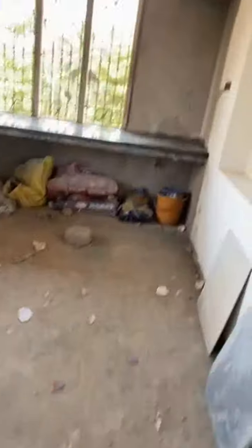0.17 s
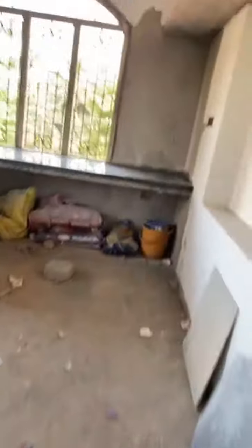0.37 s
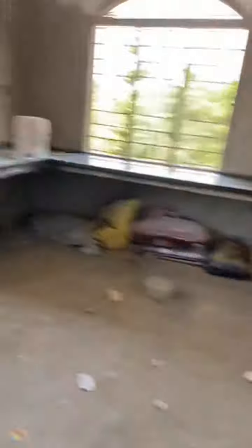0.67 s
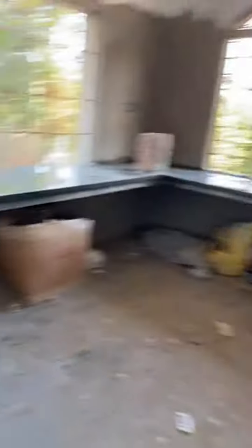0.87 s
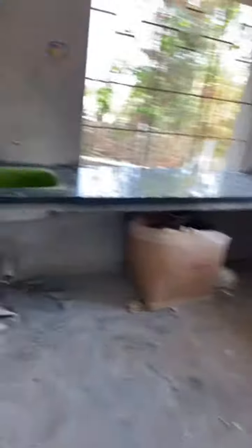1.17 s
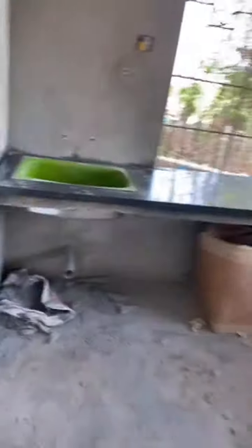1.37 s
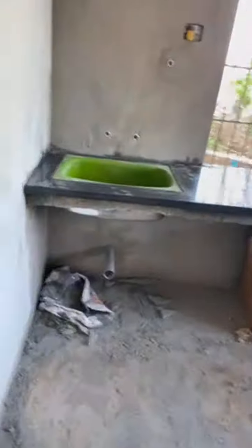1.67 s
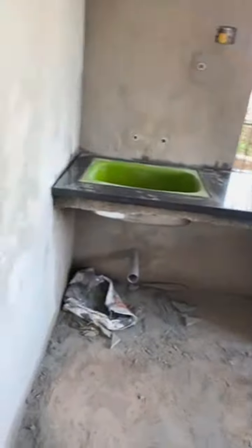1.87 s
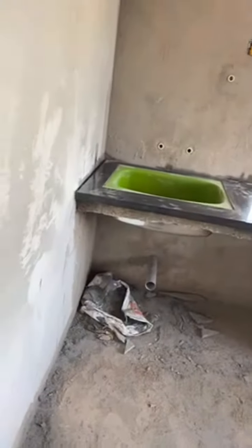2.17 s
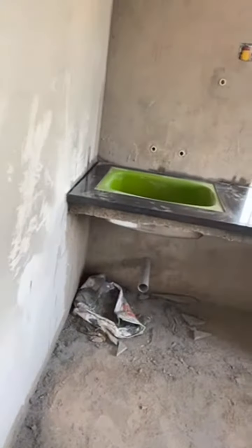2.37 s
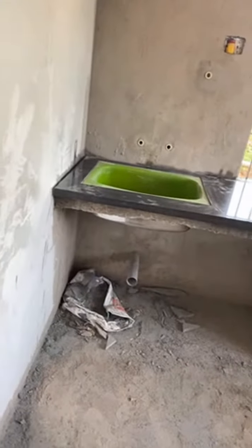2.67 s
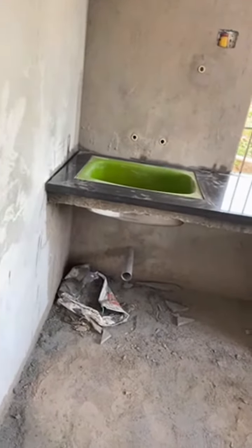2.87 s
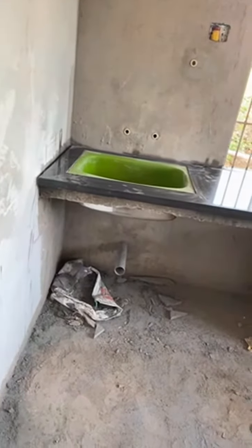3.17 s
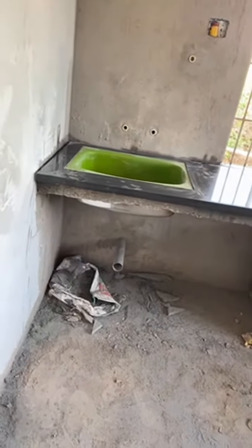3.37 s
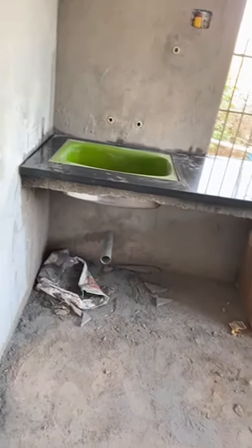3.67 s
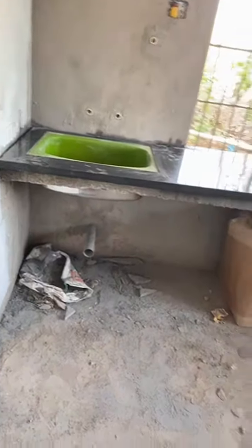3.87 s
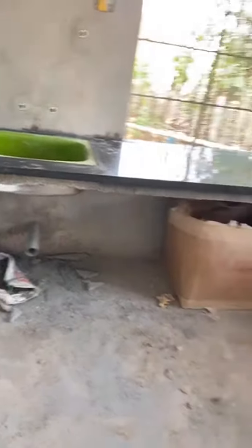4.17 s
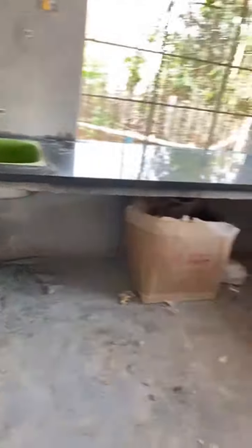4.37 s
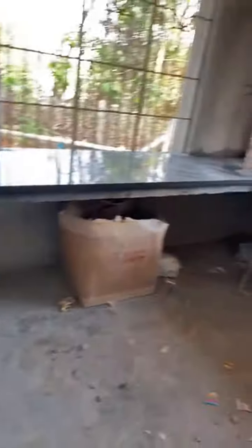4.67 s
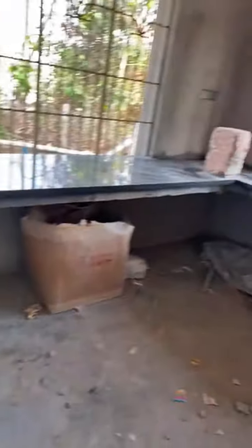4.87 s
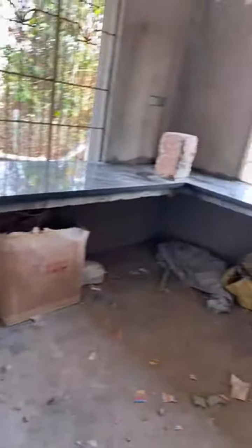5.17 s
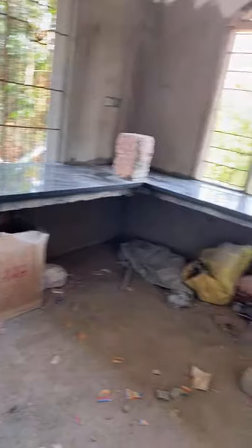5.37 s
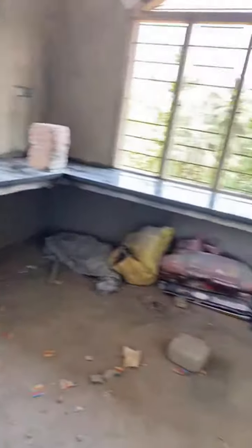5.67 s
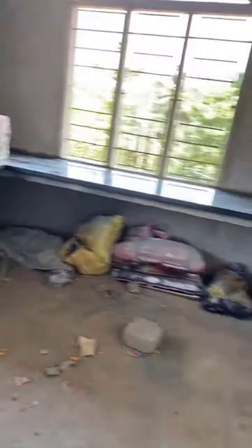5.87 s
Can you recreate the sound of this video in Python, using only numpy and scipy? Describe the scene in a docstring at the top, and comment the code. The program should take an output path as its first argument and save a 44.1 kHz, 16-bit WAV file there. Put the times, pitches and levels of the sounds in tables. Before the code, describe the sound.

A heavy engine drones outside a bare concrete room, booming as it slowly gains speed over a traffic rumble. Indoors a shoe scuffs the gritty floor twice, and the sound briefly cuts out with small clicks. Just past halfway the engine drops at a gear change, then pulls again, lower and quieter. Two dull thuds come near the end. Faint birds and insects carry on in the distance.

```python
"""One microphone in a bare concrete room; outside, a heavy engine over traffic, far birds and insects.
The engine pulls up in speed, its exhaust booming through resonances. Indoors a shoe scuffs the gritty
floor at 0.5 and 1.7 s. Between 1.4 and 2.6 s the sound cuts out four times for milliseconds, with clicks.
The engine rasps near top speed, drops at a gear change at 3.5 s and pulls again, lower, from 4.2 s.
A bright tick and a dull thud sound during the change, and two more thuds near the end."""
import sys
import numpy as np
from scipy import signal
from scipy.fft import rfft, irfft, next_fast_len
from scipy.io import wavfile
from scipy.ndimage import uniform_filter1d

SR = 44100
rng = np.random.default_rng(int(sys.argv[2]) if len(sys.argv) > 2 else 0)


def pcm_store(signal):
    """Save signal as 16-bit PCM."""
    levels = np.round(np.clip(np.atleast_2d(signal), -1, 1) * 32767)
    wavfile.write(sys.argv[1], SR, levels.astype(np.int16).T)


N = 264732
TIME = np.arange(N) / SR
LIFT_S, CLOSE_S, ENGAGE_S, OPEN_S = 3.49, 0.23, 4.2, 0.11  # throttle: start and length of each move

# the engine outside: time_s, cycles_per_s
ENGINE_SPEED = [(0.0, 44.4), (0.3, 44.4), (1.1, 47.4), (2.3, 49.9), (2.7, 51.1), (3.1, 51.5), (3.54, 52.5),
                (4.3, 38.5), (5.0, 38.8), (6.0, 40.5)]
# engine loudness: cruise_db, slope_db per cycle/s, throttle_closed_db, next_gear_db
BOOM_LOUDNESS = (-48, 0.73, -14.5, -2.5)
ROAR_LOUDNESS = (-46, 0.66, -16.5, -4.5)
# resonances of the exhaust boom and of the room: centre_hz, width_hz, gain_db
BOOM_RESONANCES = [(80.5, 6.6, 12.5), (91.3, 4, -3.5), (93, 2.8, -1.5), (98.6, 1.84, 4), (103.7, 2.8, 12.5),
                   (116.75, 1.06, 12.5), (140, 8.3, 8.5), (160.8, 4.3, -8.5), (188.3, 5.7, 5.5)]
ROOM_RESONANCES = [(146.7, 7.8, -12), (173, 3.2, 1), (191, 13.5, 3.5), (219, 24, -3), (285, 28, 3.5),
                   (358, 32, 2)]
# the boom swells or sinks for a moment: centre_s, width_s, gain_db
BOOM_SURGES = [(.03, 0.1, -2), (0.226, 0.027, 10.5), (.8, 0.056, 7), (1.2, .17, 0.5), (2.97, 0.072, -3.5),
               (1.43, 0.1, -5.5), (2.4, 0.077, -9.5), (3.6, 0.017, -7), (3.69, 0.027, 12.5),
               (4.4, .04, 1.5), (4.83, 0.03, -11), (5.8, 0.21, 4)]
# weaker engine lines, and the whine above them: speed_multiple, peak_s, width_s, level_db
WEAK_ORDERS = [(2.75, 1.57, 0.12, -40), (2.75, 2.38, 0.21, -41.5), (3.25, 3.14, 0.5, -45.5),
               (3.5, 2.7, 0.18, -42.5), (3.75, 1.1, 0.16, -46), (3.75, 2.4, .3, -49), (4, 3.04, 0.24, -46),
               (4.25, 1.33, 0.39, -47), (4.2, 2.2, 0.2, -46), (4.25, 2.51, 0.044, -40.5),
               (4.28, 3.35, 0.11, -43), (5, 3.83, 0.92, -51.5), (5.25, 3.1, 0.25, -50.5),
               (6.75, 2.8, 0.29, -54.5), (7.97, 2.45, 0.71, -55), (9.8, 2.34, 0.47, -57.5),
               (10.25, 2.98, 0.18, -55), (11, 1.16, 0.49, -57.5), (10.4, 2.65, .1, -56),
               (11, 2.924, 0.14, -47.5), (11.95, 0.42, 0.11, -54.5), (12, 2.05, 0.19, -57),
               (11.95, 3.26, 0.31, -56), (14.1, 3.22, 0.33, -57), (2.24, 4.4, 0.91, -55),
               (7, 4.58, 0.21, -52.5), (5.05, 5.67, 0.087, -48)]
WHINE_ORDERS = [(29.7, 0.68, 0.4, -62.5), (29.9, 1.32, 0.19, -61), (30.7, 1.96, 0.19, -60.5),
                (26.85, 2.28, 0.29, -62), (26.96, 2.99, 0.22, -51), (24.45, 2.98, 0.16, -56),
                (24.9, 3.22, .12, -55.5), (30, 3.03, 0.13, -54.5), (28.3, 3.43, 0.17, -55)]
# traffic behind the engine: time_s, rumble_db, murmur_db
TRAFFIC_LEVELS = [(0, -47.5, -53), (1.0, -46.5, -52), (1.6, -43, -49.5), (2.3, -44, -51.5),
                  (3.5, -42.5, -50), (3.8, -46, -53.5), (4.1, -47, -53.5), (4.7, -45, -52),
                  (5.3, -46.5, -54), (6, -46, -54)]

# noise spectra of engine, traffic, shoe, tick and thuds: frequency_hz, relative_db
ROAR_SPECTRUM = [(30, -38), (55, -14), (75, -20), (130, 6.5), (210, -1.5), (320, -9), (450, -8), (560, -5),
                 (850, -15), (1100, -14), (1420, -8.5), (2000, -14.5), (3700, -39), (6000, -44),
                 (15000, -73)]
RASP_SPECTRUM = [(600, -34), (1000, -2), (1150, -5.5), (1260, -3), (1400, -1), (1600, -16), (2400, -59)]
RUMBLE_SPECTRUM = [(25, -32), (42, -20), (60, -11.5), (90, -1), (140, -3.5), (190, 1), (340, -12),
                   (600, -22.5), (1200, -57), (4000, -91)]
MURMUR_SPECTRUM = [(150, -36), (350, -12.5), (600, -15), (1150, -20), (1350, -19.5), (1540, -17),
                   (1800, -24.5), (2400, -33.5), (3000, -37.5), (3700, -42), (4500, -40.5), (7500, -44.5),
                   (11000, -52), (16000, -64)]
SCUFF_SPECTRUM = [(300, -16), (800, 4), (1200, 12.5), (1900, 6.5), (2600, -6.5), (4000, -14.5), (9000, -28),
                  (15000, -54)]
TICK_SPECTRUM = [(500, -1), (3500, 5.5), (9000, -5), (15000, -14)]
THUD_SPECTRUM = [(60, -26), (150, -19), (195, -2), (280, -6), (380, -12), (700, -14), (3000, -51),
                 (10000, -90)]

# short noises in the room with the microphone: start_s, level_db, rise_s, decay_s
SHOE_SCUFFS = [(0.503, -49, .025, 0.035), (1.712, -44.3, 0.03, 0.11), (1.795, -54, .025, .07)]
ROOM_THUDS = [(3.675, -50, .02, .06), (5.24, -42.5, .012, .035), (5.335, -46, .012, .03)]
# tones indoors and from the nearer birds: start_s, length_s, pitch_hz, width_hz, level_db
SOLE_SQUEAKS = [(1.721, .028, 2650, 160, -54.5)]
ROOM_HUMS = [(.45, .13, 268, 20, -47), (1.55, .12, 375, 22, -43.5), (1.66, .2, 371, 30, -47),
             (1.58, .34, 268, 16, -53), (3.97, .2, 113, 9, -53), (3.95, .65, 364, 30, -57),
             (4.66, .22, 373, 24, -50.5), (5.62, .45, 180, 9, -51)]
NEAR_BIRD_NOTES = [(.56, .1, 4350, 260, -76), (.8, .11, 4500, 300, -74), (.87, .05, 4320, 160, -73),
                   (.94, .04, 4540, 200, -71), (1.08, .05, 4520, 200, -71), (1.26, .11, 4510, 300, -73),
                   (1.85, .04, 4470, 300, -70), (1.92, .04, 4620, 360, -70), (2.66, .07, 4520, 340, -73),
                   (3.62, .13, 4450, 300, -77), (4.475, .03, 4220, 200, -74), (4.628, .03, 4420, 240, -69),
                   (4.772, .025, 4440, 300, -69), (4.817, .032, 4440, 200, -66),
                   (4.86, .022, 4440, 200, -70), (4.918, .05, 4450, 260, -69), (5.038, .04, 5130, 260, -73),
                   (5.143, .055, 4420, 260, -74), (5.213, .06, 4410, 180, -67.5),
                   (5.368, .018, 4420, 200, -65), (5.438, .035, 4400, 180, -72)]
# far birds: pitch_hz, scatter_hz, chirps_per_s, level_db
FAR_FLOCKS = [(2950, 220, 200, -81), (4560, 260, 200, -80), (5350, 420, 180, -83), (7300, 800, 260, -84.5)]
# their chorus swells and sinks: time_s, gain_db
CHORUS_GAIN = [(0, 7), (.5, 5), (1.4, 4), (2.3, 2), (3.1, 6.5), (3.7, 0.5), (4.2, -1), (4.7, 3.5),
               (5.4, 1.5), (5.7, -2), (6, -1)]
# insects in the trees: start_s, length_s, pitch_hz, width_hz, level_db, buzz_depth
INSECT_TRILLS = [(.7, 0.96, 9170, 80, -83, 2), (1.6, 0.9, 9150, 80, -81.5, 2),
                 (2.72, 0.44, 9920, 340, -73, .3), (4.4, 1.05, 8870, 80, -80.5, 2.2)]

# brief silences: start_s, length_s
DROPOUTS = [(1.4605, .016), (1.6394, .003), (2.2195, .003), (2.5195, .007)]
# clicks where the sound breaks off or jumps: start_s, step_db, bump_db
SIGNAL_CLICKS = [(1.4643, -56, -76), (1.4765, -35, -72), (1.4966, -42, -35), (1.64, -32.5, -60),
                 (1.6427, -38, -53), (1.6624, -29.5, -53), (2.242, -26, -34), (2.526, -42, -34.5),
                 (2.5473, -40, -57), (3.539, -39, -35.5)]
# a tick where the sound jumps: start_s, level_db, rise_s, decay_s
SIGNAL_TICKS = [(3.539, -60, .001, .018)]


def engine(throb=0.064, flutter_db=1.42):
    """Just outside, on one shaft speed: exhaust boom, roar and rasp that throb with the firing, whine."""
    speed = curves(ENGINE_SPEED)[0]
    turns = np.cumsum(speed) / SR
    boom = exhaust_boom(speed, turns)
    firing = (1 + throb * np.cos(2 * np.pi * 2 * turns)) * amp(flutter_db * drift(33))
    roar = amp(engine_db(speed, ROAR_LOUDNESS)) * noise(ROAR_SPECTRUM)
    rasp = amp(-50.5) * bell(TIME, centre=3.04, width=0.23) * noise(RASP_SPECTRUM)
    singing = engine_orders(turns, WEAK_ORDERS, spread=0.36)
    whine = engine_orders(turns, WHINE_ORDERS, spread=0.21)
    return boom + firing * (roar + rasp) + singing + whine


def exhaust_boom(speed, turns, spread=0.14):
    """Low exhaust orders boom or sink as they sweep through resonances."""
    boom_db = engine_db(speed, BOOM_LOUDNESS) + humps(TIME, BOOM_SURGES)
    order_db = {order: boom_db + humps(order * speed, BOOM_RESONANCES) for order in (2, 3, 4)}
    boom = sum(amp(db) * fading_sine(order * turns, spread, 3.7) for order, db in order_db.items())
    # unequal cylinders sound an octave below the firing
    return boom + amp(order_db[2] - 17) * fading_sine(turns, spread, 5)


def engine_orders(turns, orders, spread):
    """Lines at multiples of the engine's speed swell and fade while it pulls."""
    lifted, engaged = gear_change()
    lines = sum(amp(db) * bell(TIME, peak_s, width_s) * fading_sine(order * turns, spread, 9.9)
                for order, peak_s, width_s, db in orders)
    return (1 - lifted + engaged) * lines


def engine_db(speed, law, cruise_hz=50):
    """The engine is louder the faster it turns, and quieter off the throttle and in the next gear."""
    cruise_db, slope_db, closed_db, geared_db = law
    lifted, engaged = gear_change()
    pulling_db = cruise_db + slope_db * (speed - cruise_hz)
    return pulling_db + closed_db * (lifted - engaged) + geared_db * engaged


def gear_change():
    """Two ramps, 0 to 1: the throttle lifts, then the next gear engages."""
    return np.clip((TIME - LIFT_S) / CLOSE_S, 0, 1), np.clip((TIME - ENGAGE_S) / OPEN_S, 0, 1)


def traffic(rumble_swell_db=1.5, murmur_swell_db=1.1):
    """Traffic farther off: a rumble that booms in the bare room, and a murmur above it."""
    rumble_db, murmur_db = curves(TRAFFIC_LEVELS)
    rumble = amp(rumble_db + rumble_swell_db * drift(29)) * noise(RUMBLE_SPECTRUM, ROOM_RESONANCES)
    murmur = amp(murmur_db + murmur_swell_db * drift(24)) * noise(MURMUR_SPECTRUM)
    return rumble + murmur


def shoe():
    """Indoors, a sole scrapes and squeaks on sandy concrete."""
    scrapes = sum(burst(row, SCUFF_SPECTRUM, grain_db=2.0) for row in SHOE_SCUFFS)
    return scrapes + tones(SOLE_SQUEAKS, spread=0.6)


def thuds():
    """Dull knocks boom briefly between the bare walls."""
    return sum(burst(row, THUD_SPECTRUM, grain_db=4.0) for row in ROOM_THUDS)


def hums():
    """Low hums swell and fade in the room."""
    return tones(ROOM_HUMS, spread=0.23)


def tick():
    """A short, bright tick where the sound jumps at 3.5 s."""
    return sum(burst(row, TICK_SPECTRUM, grain_db=6.5) for row in SIGNAL_TICKS)


def birds():
    """Out in the trees, a far chorus and a few nearer, rough chirps, smeared by the room."""
    chorus = amp(curves(CHORUS_GAIN)[0]) * sum(far_flock(*row) for row in FAR_FLOCKS)
    far = room(chorus, t60_s=.3, wet=.4)
    notes = tones(NEAR_BIRD_NOTES, spread=0.55, swell=.35)
    return far + room(notes, t60_s=.25, wet=.15)


def far_flock(centre_hz, scatter_hz, per_s, db, chirp_s=.01, glide_hz=400, range_db=18, tries=1600):
    """Many birds at different distances: tiny gliding chirps that swell and die, most of them faint."""
    out, t = np.zeros(N + SR), np.arange(SR // 24) / SR
    for when, chance, pitch, distance, glide, span in rng.random((tries, 6)):
        if chance * tries < per_s * N / SR:
            hz = centre_hz + scatter_hz * np.log(pitch / (1 - pitch)) / 2  # crowds round the centre
            age = t / (chirp_s * (.5 + span))
            turns = hz * t + (glide - .5) * glide_hz * chirp_s * (1 - np.exp(-age))
            envelope = amp(-range_db * distance) * age * np.exp(-2 * age)
            out[int(when * N):][:len(t)] += envelope * np.sin(2 * np.pi * turns)
    return amp(db) * unit(out[:N])


def insects(wingbeat_hz=195):
    """Faint, high trills from the trees, chopped into pulses by the wings."""
    wingbeat = np.cos(2 * np.pi * wingbeat_hz * TIME)
    return sum(unit(np.exp(depth * wingbeat)) * tones([trill], spread=4.7, swell=0.78)
               for *trill, depth in INSECT_TRILLS)


def room(x, t60_s, wet):
    """Bare concrete round the microphone smears a sound with dense reflections."""
    t = np.arange(SR // 2) / SR
    tail = rng.standard_normal(len(t)) * amp(-60 * t / t60_s)
    reflections = signal.fftconvolve(x, tail / np.linalg.norm(tail))[:N]
    return np.sqrt(1 - wet) * x + np.sqrt(wet) * reflections


def burst(row, spectrum, grain_db):
    """Grainy noise that rises fast and dies away."""
    start_s, db, rise_s, decay_s = row
    age = np.maximum(TIME - start_s, 0)
    envelope = np.minimum(age / rise_s, 1) * np.exp(-np.maximum(age - rise_s, 0) / decay_s)
    return amp(db + grain_db * drift(130)) * envelope * noise(spectrum)


def tones(rows, spread, swell=0.17):
    """Tones blurred by reflections, each fading in and out."""
    out = np.zeros(N + 2 * SR)
    for start_s, length_s, hz, width_hz, db in rows:
        t = np.arange(0, length_s, 1 / SR)
        arch = abs(np.sin(np.pi * t / length_s)) ** swell
        out[int(start_s * SR):][:len(t)] += amp(db) * arch * fading_sine(hz * t, spread, width_hz / 2)
    return out[:N]


def fading_sine(turns, spread, rate_hz):
    """A sine plus a randomly fading copy, as its reflections add to it."""
    phase = 2 * np.pi * ((turns + rng.random()) % 1)
    along, across = (spread * drift(rate_hz, size=len(turns)) for _ in range(2))
    return ((1 + along) * np.cos(phase) + across * np.sin(phase)) / np.sqrt(.5 + spread ** 2)


def noise(spectrum, resonances=()):
    """Noise of rms 1 with a given spectrum and resonances."""
    size = next_fast_len(N, real=True)
    hz = np.fft.rfftfreq(size, 1 / SR)
    knot_hz, knot_db = np.transpose(spectrum)
    db = np.interp(np.log(hz + 1), np.log(knot_hz), knot_db) + humps(hz, resonances)
    return unit(irfft(rfft(rng.standard_normal(size)) * amp(db), size)[:N])


def drift(rate_hz, size=N, points=8192):
    """A smooth random wander of rms about 1."""
    hz = np.fft.rfftfreq(points, N / SR / points)
    slow = irfft(rfft(rng.standard_normal(points)) / (1 + (hz / rate_hz) ** 4), points)
    return np.interp(TIME[:size], np.linspace(0, N / SR, points), unit(slow))


def curves(rows):
    """Each column after time_s as a curve over time."""
    time_s, *columns = np.transpose(rows)
    return [np.interp(TIME, time_s, column) for column in columns]


def humps(x, rows):
    """Decibels added by rows of centre, width, gain_db."""
    return sum(db * bell(x, centre, width) for centre, width, db in rows)


def bell(x, centre, width):
    """A smooth hump of height 1."""
    return np.exp(-.5 * ((x - centre) / width) ** 2)


def amp(db):
    """Decibels to gain."""
    return 10 ** (np.asarray(db) / 20)


def unit(x):
    """Scales to rms 1."""
    return x / np.sqrt(np.mean(x ** 2) + 1e-20)


def scene():
    """Outdoors and indoors on the one microphone, with the tick."""
    return (engine() + traffic() + hums() + birds() + insects() + shoe() + tick() + thuds())[None]


def record(dry, bass_hz=50, top_hz=15900, settle_s=0.00038, bump_s=.0028):
    """The microphone loses the deep bass; its signal drops out, clicks and bumps, and is band-limited."""
    out = signal.sosfilt(signal.butter(6, bass_hz, "high", fs=SR, output="sos"), dry)
    for start_s, length_s in DROPOUTS:
        live = (TIME < start_s) | (TIME > start_s + length_s)
        out *= uniform_filter1d(1. * live, size=24)
    for start_s, step_db, bump_db in SIGNAL_CLICKS:
        age = TIME - start_s
        out -= amp(step_db) / 2 * np.sign(age) * np.exp(-abs(age) / settle_s)  # a step in the wave
        out += amp(bump_db) * np.exp(-((age - bump_s) / bump_s) ** 2)  # a soft, low bump
    lowpass = signal.firwin(511, top_hz, window=("kaiser", 9), fs=SR)
    return signal.oaconvolve(out, lowpass[None], "same")


dry = scene()
out = record(dry)
pcm_store(out)
```